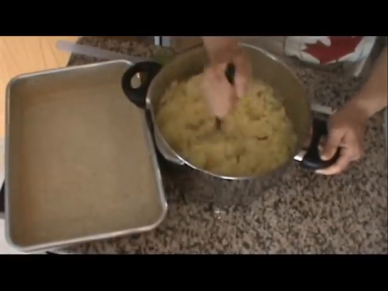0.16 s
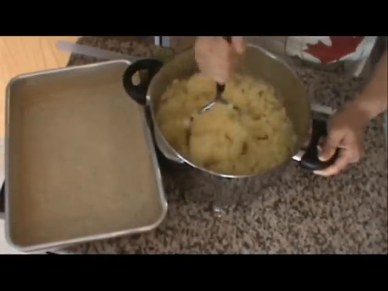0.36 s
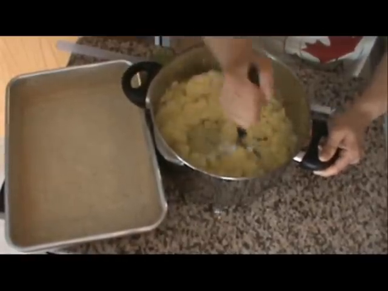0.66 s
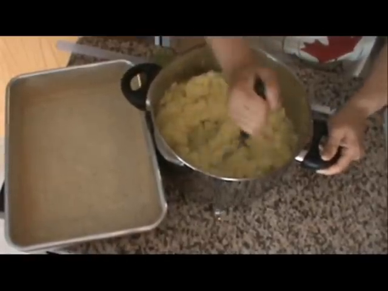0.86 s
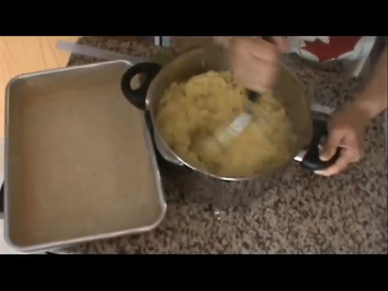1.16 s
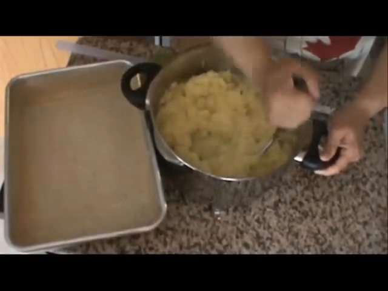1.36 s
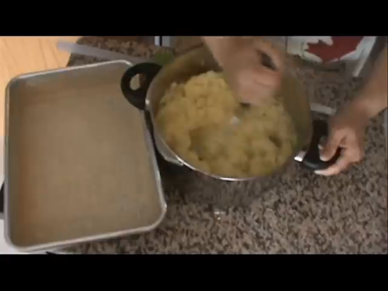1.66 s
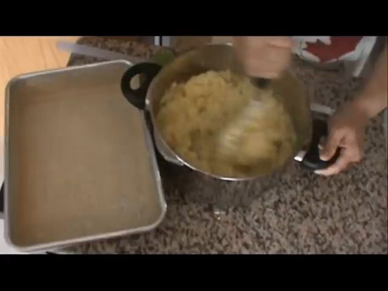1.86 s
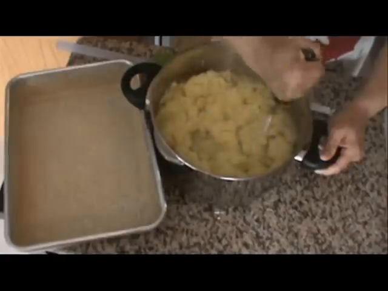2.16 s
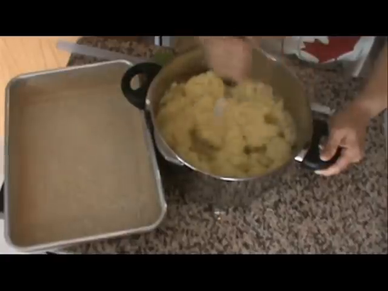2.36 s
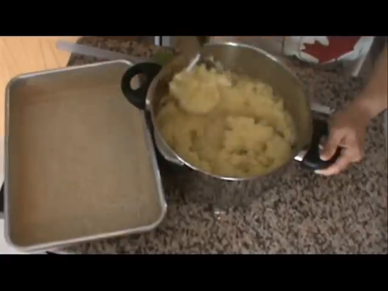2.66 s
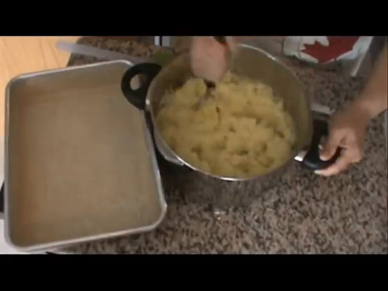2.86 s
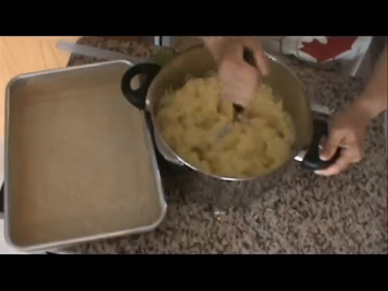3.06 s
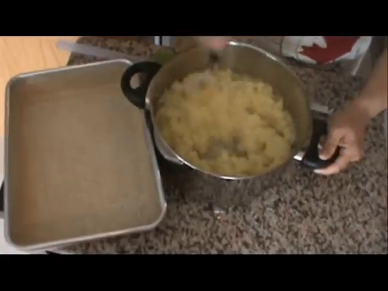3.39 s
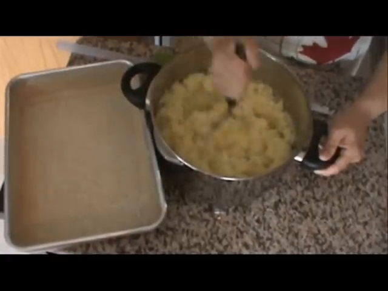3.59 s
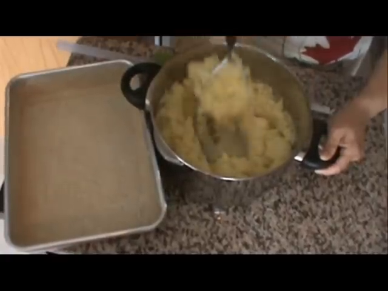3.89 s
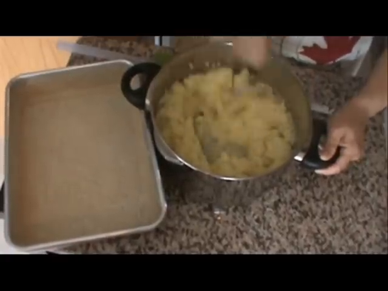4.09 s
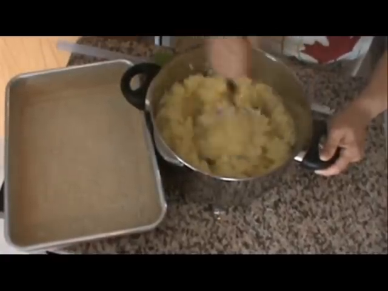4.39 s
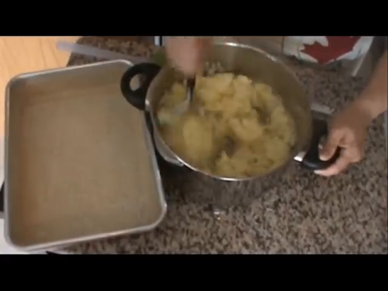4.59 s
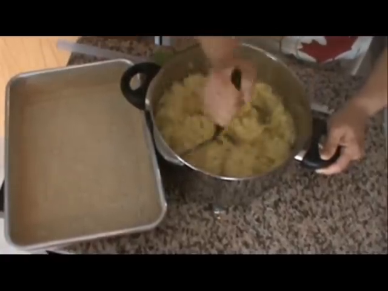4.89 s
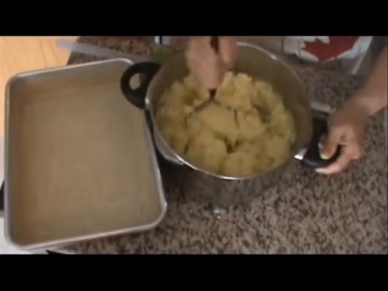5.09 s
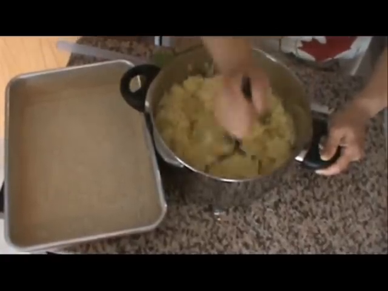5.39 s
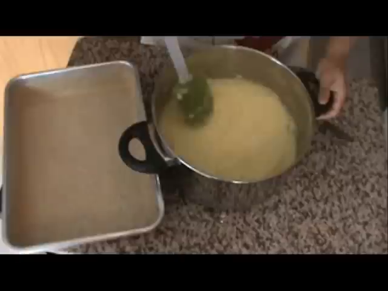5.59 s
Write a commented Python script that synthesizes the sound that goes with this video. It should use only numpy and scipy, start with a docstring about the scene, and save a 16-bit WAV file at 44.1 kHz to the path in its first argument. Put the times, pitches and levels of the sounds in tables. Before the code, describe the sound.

A steel hand masher knocks, scrapes and squelches through hot boiled potatoes in a steel pot, roughly twice every second or so, in a small kitchen.

```python
"""A steel hand masher is driven again and again through boiled potatoes in a steel pot on a stone counter.
Each stroke knocks the wall (noise bursts into wall modes), scrapes down it (dense random clicks) and thuds
on the bottom (low ringing modes). The wet mash squelches (grains in moving cavities), plops and ticks, and
hollow pops come from one side. Under it lie the hum, air and echo of a small kitchen, heard by a close
stereo pair that overloads on the knocks."""
import sys
import numpy as np
from scipy import signal
from scipy.fft import rfft, irfft, next_fast_len
from scipy.io import wavfile
from scipy.ndimage import uniform_filter1d

SR = 44100
rng = np.random.default_rng(int(sys.argv[2]) if len(sys.argv) > 2 else 0)


def log_audio(samples):
    """Write samples as a 16-bit WAV file to the path given in sys.argv[1]."""
    # one column per channel
    frames = np.atleast_2d(samples).T
    # limit to full scale, then quantise
    limited = np.clip(frames, -1, 1)
    pcm = np.round(limited * 32767).astype(np.int16)
    wavfile.write(sys.argv[1], SR, pcm)


def gain_from_db(level_db):
    """Convert decibel levels to linear amplitude factors (20 dB per decade)."""
    decades = np.asarray(level_db, float) / 20
    return 10 ** decades


N = 253303
HZ = np.maximum(np.arange(N // 2 + 1) * SR / N, 1)
CONTROL_STEP = 32   # samples between points of the slow level curves

# Modes of the pot bottom. Each row: pitch in Hz, relative level in dB, 60 dB decay time in s.
BOTTOM_MODES = [(214, 0.5, 0.17), (239, 0.5, 0.16), (269.6, -6, 0.22)]


def rms_one(x):
    """Scales a signal to unit rms."""
    return x / np.sqrt(np.mean(x ** 2) + 1e-20)


def at_hz(points, hz):
    """Reads a table of (Hz, value) on a log-frequency axis."""
    p = np.array(points, float)
    return np.interp(np.log(hz), np.log(np.maximum(p[:, 0], 1)), p[:, 1])


def coloured(x, spectrum):
    """Filters a steady signal by a spectrum in dB and scales it to unit rms."""
    return rms_one(irfft(rfft(x) * gain_from_db(at_hz(spectrum, HZ)), N))


def drift(rate):
    """Slow random wandering of unit rms: noise through two equal lowpass poles at rate Hz."""
    r = np.exp(-2 * np.pi * rate / SR)
    wander = signal.lfilter([1], [1, -2 * r, r * r], rng.standard_normal(N + SR))
    return rms_one(wander[SR:])   # the first second lets the filter settle


def grains(per_s, spread_db):
    """Random clicks of either sign with a long tail of large ones."""
    sizes = gain_from_db(spread_db * np.minimum(rng.exponential(1, N), 4)) * rng.choice([-1, 1], N)
    return sizes * (rng.random(N) < per_s / SR)


def resonance(x, hz, width):
    """Two-pole band of the given width in Hz, gain 1 at its centre."""
    r = np.exp(-np.pi * width / SR)
    poles = [1, -2 * r * np.cos(2 * np.pi * hz / SR), r * r]
    return signal.lfilter([(1 - r * r) / 2, 0, (r * r - 1) / 2], poles, x)


def ring(x, modes):
    """Decaying modes in parallel; a unit click sets each one ringing at its own level."""
    out = 0
    for hz, level_db, t60 in modes:
        r, w = gain_from_db(-60 / (t60 * SR)), 2 * np.pi * hz / SR
        poles = [1, -2 * r * np.cos(w), r * r]
        out = out + signal.lfilter([0, gain_from_db(level_db) * np.sin(w)], poles, x + 1e-18)
    return out


def add(out, s, piece):
    """Lays a piece in at time s."""
    i = round(s * SR)
    out[i:i + len(piece)] += piece[:N - i]


def nearby(x, modes, centre_hz, octaves):
    """Drives the modes (Hz, width Hz, dB) around a moving centre hardest, with alternating signs."""
    out = 0
    for k, (hz, width, db) in enumerate(modes):
        share = np.exp(-.5 * (np.log2(hz / centre_hz) / octaves) ** 2)
        out = out + gain_from_db(db) * resonance(x * share, hz, max(width, 10)) * (-1) ** k
    return out


def pot_wall(x, centre_hz, ring_db):
    """The direct sound plus the resonances of the mash-damped wall near the contact."""
    # Each row: mode pitch in Hz, width in Hz, relative level in dB.
    wall_modes = [(614, 43, 10.5), (860, 15, 5), (1080, 30, 5), (1795, 34, 5.5), (1870, 290, -8.5),
                  (2260, 14, 5.5), (3020, 35, -13), (3163, 31, 3), (3600, 97, -8), (4700, 71, -12),
                  (5930, 110, -9.5), (6260, 110, -18.5)]
    return x + gain_from_db(ring_db) * nearby(x, wall_modes, centre_hz, octaves=0.26)


def press(rows, tail_db, sag_db, lift_db, fade_db):
    """Sudden start, sagging hold, quick lift, slow tail (rates in dB per s): gains and time since the lift."""
    s, level_db, held = rows[:, :3].T[:, :, None]
    t = np.arange(0, N, CONTROL_STEP) / SR - s
    since = np.maximum(t - held, 0)
    stroke = gain_from_db(level_db - sag_db * np.clip(t, 0, held) - lift_db * since)
    tail = gain_from_db(tail_db[:, None] - fade_db * since)
    return (stroke + tail) * (t >= 0), since


def swell(rows):
    """A bell-shaped rise and fall round each crest, one row of gains per event."""
    s, level_db, width = rows[:, :3].T[:, :, None]
    t = np.arange(0, N, CONTROL_STEP) / SR - s
    return gain_from_db(level_db) * np.exp(-.5 * (t / width) ** 2)


def blend(gains, values):
    """Level of all events together in dB, and a value weighted by each event's power."""
    power = np.sum(gains ** 2, axis=0) + 1e-14
    mean = np.sum(gains ** 2 * values, axis=0) / power
    at = np.arange(N) / CONTROL_STEP
    return [np.interp(at, np.arange(len(c)), c) for c in (10 * np.log10(power), mean)]


def patchy(x, patch_db):
    """Half-octave bands swell and sink on their own as the contact wanders."""
    change = 0
    for hz in 1000 * 2. ** np.arange(0, 4, .5):
        band = signal.sosfilt(signal.butter(2, [hz, 1.4 * hz], "band", fs=SR, output="sos"), x)
        change = change + (gain_from_db(patch_db * drift(23.0)) - 1) * band
    return x + change


def rubbing():
    """Steel slips on steel in dense, clumped clicks; the harder the contact, the more the wall rings."""
    # Steel driven down the wall. Each row: start in seconds, scrape level in dB before the body's lift,
    # hold in seconds, sheen in dB relative to that level, pitch in Hz of the wall modes nearest the contact.
    stroke_rows = [(0, -19, 0.15, -9.5, 3330), (0.136, -20, 0.006, -1, 2350),
                   (0.748, -14.5, 0.034, -0.5, 3540), (1.366, -11.5, 0.068, -7.5, 3730),
                   (2.037, -12, 0.09, -3, 4390), (2.695, -11.5, 0.0037, -11, 3690),
                   (2.902, -37, 0.25, -5, 2190), (3.3765, -6, 0.041, -11.5, 3140),
                   (4.146, -25.5, 0.025, 0.5, 4950), (4.731, -19, 0.18, -8.5, 3720),
                   (4.966, -26.5, 0.027, -11, 1990), (5.397, -18, 0.15, -5.5, 3300),
                   (5.57, -17.5, 0.11, -11, 2620)]
    # Steel brushing the wall, swelling and sinking. Each row: crest in seconds, scrape level in dB before
    # the body's lift, half width in seconds, sheen in dB relative to that level, contact pitch in Hz.
    brush_rows = [(0.109, -37.5, 0.018, 23.5, 2500), (0.275, -44.5, 0.011, 17, 3200),
                  (1.05, -38, 0.13, -2, 2630), (1.499, -19.5, 0.03, 8, 6200),
                  (1.73, -40.5, 0.08, 5.5, 4600), (2.125, -17, 0.0077, 3, 6100),
                  (2.645, -36.5, 0.017, -4, 4460), (2.773, -21.5, 0.058, -3.5, 3600),
                  (3.0, -27, 0.018, -21, 2200), (3.55, -26, 0.082, -7, 2700),
                  (4.12, -33.5, 0.041, -2, 3500), (4.39, -28.5, 0.083, -9, 3000),
                  (4.665, -28, 0.021, -30, 4300), (4.874, -21, 0.022, 3, 4700),
                  (5.058, -22, 0.03, -9.5, 2000), (5.143, -13.5, 0.011, -13, 4700),
                  (5.498, -25, 0.013, 9, 6030), (5.54, -23.5, 0.07, -18.5, 4500)]
    # Colour of the slips. Each row: frequency in Hz, relative density in dB per Hz.
    scrape_colour = [(1000, -13), (2000, -4), (3600, 0.5), (5800, 1), (13500, -3), (15500, -25.5)]
    strokes, brushes = np.array(stroke_rows), np.array(brush_rows)
    # the mash sliding back leaves a tail that follows part of the stroke's level
    slide_db = -22 + 0.47 * strokes[:, 1]
    driven, _ = press(strokes, slide_db, sag_db=82.5, lift_db=271, fade_db=39)
    brushed = swell(brushes)
    contacts = np.vstack([strokes[:, 4:], brushes[:, 4:]])
    scrape_db, contact_hz = blend(np.vstack([driven, brushed]), contacts)
    shining = np.vstack([driven * gain_from_db(strokes[:, 3:4]), brushed * gain_from_db(brushes[:, 3:4])])
    sheen_db, _ = blend(shining, 0)

    clumping = gain_from_db(0.82 * drift(32) + 2.13 * drift(300))
    slips = coloured(grains(per_s=13000, spread_db=3.0) * clumping, scrape_colour)
    slips = patchy(slips, patch_db=2.5)
    low, high = (signal.butter(2, 6000, kind, fs=SR, output="sos") for kind in ("low", "high"))
    grit = signal.sosfilt(np.tile(low, (2, 1)), slips)   # each filter runs twice
    sheen = signal.sosfilt(np.tile(high, (2, 1)), slips)
    wall_ring_db = np.minimum(26.0 + 0.71 * scrape_db, 9.0)
    body = pot_wall(gain_from_db(scrape_db) * grit, contact_hz, wall_ring_db)
    return gain_from_db(3.5) * body + gain_from_db(sheen_db) * rms_one(sheen)


def squelch():
    """Wet grains ring cavities of the size the mash has at that moment."""
    # Mash squeezed through the grid. Each row: start in seconds, squelch level in dB, hold in seconds,
    # settling level in dB, cavity pitch in Hz.
    push_rows = [(0, -19, 0.12, -51, 1190), (0.139, -12, 0.053, -26.5, 1780),
                 (0.746, -12.5, 0.0023, -41, 850), (1.37, -18.5, 0.0026, -18, 1310),
                 (1.514, -15.5, 0.0025, -18.5, 910), (2.039, -15, 0.037, -17.5, 774),
                 (2.694, -14, 0.0045, -22, 1270), (2.9, -22.5, 0.008, -20.5, 1390),
                 (3.378, -10.5, 0.047, -18.5, 1060), (3.607, -19, 0.0032, -19.5, 1340),
                 (4.148, -39.5, 0.085, -22.5, 1010), (4.734, -22.5, 0.0064, -24, 1080),
                 (4.97, -19.5, 0.0056, -17, 1270), (5.396, -8, 0.002, -28.5, 1157),
                 (5.569, -15.5, 0.063, -24.5, 1384)]
    # Mash folding over, swelling and sinking. Each row: crest in seconds, squelch level in dB,
    # half width in seconds, cavity pitch in Hz.
    fold_rows = [(0.28, -27, 0.082, 1510), (0.836, -14.5, 0.038, 900), (1.009, -24.5, 0.052, 1390),
                 (1.47, -20, 0.049, 895), (2.29, -30.5, 0.097, 716), (2.63, -24.5, 0.011, 1276),
                 (3.001, -17, 0.015, 1120), (3.052, -19, 0.022, 1450), (4.36, -19.5, 0.057, 1400),
                 (4.92, -22.5, 0.048, 985), (5.09, -24.5, 0.058, 860), (5.54, -24, 0.067, 950)]
    # Colour of the wet grains. Each row: frequency in Hz, relative density in dB per Hz.
    wet_colour = [(250, -13.5), (500, -2), (1000, 2.5), (2000, -1), (4000, -19.5)]
    settled_hz, closing_s = 600, 0.67   # the cavities sink to this pitch as the mash settles
    pushes, folds = np.array(push_rows), np.array(fold_rows)
    pushed, since = press(pushes, pushes[:, 3], sag_db=56, lift_db=368, fade_db=70)
    folded = swell(folds)
    sinking_hz = settled_hz + (pushes[:, 4:] - settled_hz) * np.exp(-since / closing_s)
    folding_hz = folds[:, 3:] + 0 * folded
    squelch_db, cavity_hz = blend(np.vstack([pushed, folded]), np.vstack([sinking_hz, folding_hz]))

    wet = coloured(grains(per_s=3000, spread_db=2.5) * gain_from_db(2.35 * drift(28)), wet_colour)
    cavities = [(hz, 0.18 * hz, 0) for hz in np.geomspace(500, 2200, 12)]
    mash = rms_one(wet + gain_from_db(-3.0) * nearby(wet, cavities, cavity_hz, octaves=0.16))
    # long hard pushes rumble in the bottom and shake the wall
    rumble = gain_from_db(1.62 * uniform_filter1d(squelch_db, size=1800)) * rng.standard_normal(N)
    bottom = ring(rumble, BOTTOM_MODES)
    wall = pot_wall(gain_from_db(squelch_db) * mash, cavity_hz * 0.71, ring_db=9.5 + 0.67 * squelch_db)
    return wall + gain_from_db(-30.5) * bottom


def room_air():
    """Stereo air noise of gently drifting level, with a hum that wavers in level and phase."""
    # Colour of the air. Each row: frequency in Hz, relative density in dB per Hz.
    air_colour = [(12, -39.5), (20, -11.5), (59, 1), (87, -11.5), (122, -5.5), (213, -9.5), (289, -6.5),
                  (614, -13), (725, -14.5), (2090, -26), (15500, -36)]
    # Left-right likeness of the air. Each row: frequency in Hz, likeness from 0 to 1.
    likeness = [(60, 1), (380, 0.93), (1000, 0.44), (2400, .05), (8000, 0.82)]
    # Hum tones. Each row: mean pitch in Hz, middle level in dB.
    hum_tones = [(118.4, -43), (242.2, -39)]
    air_db = -31.5
    mid, side = rfft(rng.standard_normal((2, N)))
    alike = np.clip(at_hz(likeness, HZ), 0, 1)
    pair = np.sqrt(1 + alike) * mid + np.sqrt(1 - alike) * side * [[1], [-1]]
    noise = rms_one(irfft(pair * gain_from_db(at_hz(air_colour, HZ)), N))
    air = gain_from_db(air_db + 1.0 * drift(1)) * noise
    t = np.arange(N) / SR
    hum = 0
    for hz, db in hum_tones:
        hum = hum + gain_from_db(db + 2.2 * drift(37)) * np.sin(2 * np.pi * hz * t + 3.1 * drift(1.5))
    return air + hum


def kitchen(x):
    """Room echo from eight feedback delays a side, each pass duller and weaker."""
    t60_s, wall_cut_hz = 0.61, 7500
    size = next_fast_len(N + SR)
    w = 2 * np.pi * np.arange(size // 2 + 1) / size
    dull = 1 / (1 + 1j * w * SR / (2 * np.pi * wall_cut_hz))
    out = np.zeros((2, len(w)), complex)
    for k, lag in enumerate(rng.uniform(.008, .035, 16) * SR):
        loop = gain_from_db(-60 * lag / SR / t60_s) * dull * np.exp(-1j * w * int(lag))
        out[k % 2] += loop / (1 - loop) * (-1) ** (k // 2)
    return irfft(out * rfft(x, size), size)[:, :N]


def ticks():
    """Sticky mash tears off the steel in short bright snaps of filtered noise, with faint ones at random."""
    # Each row: start in seconds, peak level in dB, pitch in Hz.
    tears = [(0.1056, -17, 7850), (1.055, -13.5, 7830), (1.725, -9.5, 5060), (1.827, -15, 11400),
             (2.517, -14.5, 10200), (3.7577, -12, 4200)]
    out, t = np.zeros(N), np.arange(800) / SR
    for s, peak_db, hz in tears:
        noise = rng.standard_normal(len(t))
        snap = resonance(noise * np.exp(-t / 0.003), hz, 0.45 * hz)
        add(out, s, gain_from_db(peak_db) * snap / np.max(np.abs(snap)))
    envelope = signal.lfilter([1], [1, -.985], np.abs(grains(per_s=45, spread_db=3.0)))
    faint = envelope * rng.standard_normal(N)
    return out + gain_from_db(-33) * resonance(faint, 9500, 6000)


def knocks():
    """A crack of chattering contact into the wall, a rumbling push on the bottom, a slower one on the counter."""
    # Masher on pot. Each row: start in seconds, crack peak in dB, bottom thud in dB before its lift,
    # pitch of the clank in Hz.
    hits = [(0.14, 6, -16.5, 2000), (0.166, 6, -17.5, 1290), (0.747, -2.5, -23, 1250),
            (0.836, 9.5, -15, 1770), (1.368, 6.5, -44, 1270), (1.375, 3, -37, 1290),
            (1.52, 4.5, -6.5, 1080), (1.527, -3, -22.5, 930), (2.036, 6, -17.5, 2480),
            (2.63, -12, -35.5, 1360), (2.646, -10.5, -39.5, 3800), (2.696, 7, -17.5, 3220),
            (2.902, 2.5, -14.5, 1756), (2.908, 3, -19.5, 1500), (3.377, 4.5, -17, 3100),
            (3.61, 10, -15.5, 1300), (4.218, -6, -38, 5030), (4.222, 4, -19.5, 1200),
            (4.737, -16, -19, 1030), (4.968, 12.5, -9.5, 1310), (5.396, 9.5, -22.5, 3600),
            (5.549, -1.5, -20.5, 1190), (5.571, 4.5, -10.5, 2340), (5.575, 1, -25.5, 2810),
            (5.59, 2.5, -16, 1885)]
    # The pot pressed on the counter. Each row: start in seconds, push in dB.
    counter_pushes = [(0.171, -30.5), (0.855, -26), (1.541, -23.5), (2.279, -26), (2.92, -29), (3.631, -29),
                      (4.241, -29.5)]
    # Modes of the counter top. Each row: pitch in Hz, relative level in dB, 60 dB decay time in s.
    counter_modes = [(30.8, 2, 0.48), (56.4, 7.5, 0.45)]
    thud_lift_db = 7.5
    out, shake = np.zeros((2, N))
    t = np.arange(9000) / SR
    for s, peak_db, thud_db, clank_hz in hits:
        noise, grind = rng.standard_normal((2, len(t)))
        burst = noise * (np.exp(-t / 0.0016) + 0.14 * np.exp(-t / .007))   # first touch, then chatter
        burst[0] = 3   # the contact opens hard
        clank = resonance(resonance(burst, clank_hz, 1.3 * clank_hz), clank_hz, 1.3 * clank_hz)
        crack = clank + gain_from_db(-14.0) * resonance(burst, 2 * clank_hz, 4000)
        crack = pot_wall(crack, clank_hz, ring_db=12)
        # the grid grinds down, so every thud stirs the modes anew
        thud = ring(np.diff(grind * np.exp(-t / 0.018), prepend=0), BOTTOM_MODES)
        thud *= np.cos(.5 * np.pi * t / t[-1]) / np.max(np.abs(thud))
        add(out, s, gain_from_db(peak_db) * crack / np.max(np.abs(crack)) + gain_from_db(thud_db + thud_lift_db) * thud)
    for s, db in counter_pushes:
        add(shake, s, gain_from_db(db) * np.hanning(500) / 250)
    return out + ring(shake, counter_modes)


def plops(rows):
    """Each air pocket bursts as a rough puff of noise ringing a wide cavity and a fainter one above it."""
    out, t = np.zeros(N), np.arange(3000) / SR
    for s, peak_db, hz, length in rows:
        air = rng.standard_normal(len(t))
        air[:20] = .006 / length   # small pockets give way in one push
        puff = air * (1 - np.exp(-t / 0.00026)) * np.exp(-t / max(length, .001))
        cavity = resonance(resonance(puff, hz, 0.35 * hz), hz, 0.35 * hz)
        upper = resonance(resonance(puff, 2.35 * hz, 1.8 * hz), 2.35 * hz, 1.8 * hz)
        burst = cavity + gain_from_db(-13) * upper
        add(out, s, gain_from_db(peak_db) * burst / np.max(np.abs(burst)))
    return out


def biting():
    """The grid sings as it bites into the wall: chatter of the contact rings its own modes in clear bands."""
    # Each row: start in seconds, level in dB before the lift at the end, hold in seconds,
    # pitch in Hz of the modes driven hardest.
    bite_rows = [(1.42, -23.5, 0.032, 5700), (2.038, -10.5, 0.052, 2600), (5.394, -31, 0.085, 3710)]
    # Modes of the masher grid. Each row: pitch in Hz, width in Hz, relative level in dB.
    grid_modes = [(2230, 120, -1.5), (3520, 200, -3), (4750, 350, -7), (5800, 110, -3), (6130, 150, -5)]
    bites = np.array(bite_rows)
    gains, _ = press(bites, -11 + bites[:, 1], sag_db=60, lift_db=302, fade_db=90)
    bite_db, driven_hz = blend(gains, bites[:, 3:])
    chatter = rms_one(grains(per_s=4000, spread_db=4.5))
    return gain_from_db(22.5) * nearby(gain_from_db(bite_db) * chatter, grid_modes, driven_hz, octaves=0.72)


def scene():
    """The pot reaches the two capsules with a small lean and lead; walls close by echo from the sides."""
    # Air pockets bursting in the mash. Each row: start in seconds, peak in dB, pitch in Hz, length in seconds.
    pockets = [(0.259, -6.5, 1640, 0.039), (0.793, -6.5, 860, 0.0028), (0.853, -5, 1570, 0.0083),
               (0.981, -8.5, 1670, 0.025), (2.248, -7.5, 660, 0.0046), (2.847, -13.5, 880, 0.029),
               (2.999, -9, 1630, 0.0062), (4.195, -4.5, 1080, 0.0028), (4.275, -16, 990, 0.0047),
               (4.308, -16, 1030, .008)]
    # Hollow pops from off to one side. Each row: start in seconds, peak in dB, pitch in Hz, length in seconds.
    side_pockets = [(2.391, -16, 1000, 0.018), (3.157, -15.5, 780, 0.0051), (4.489, -1.5, 850, 0.0034),
                    (4.547, -4.5, 1040, 0.0076), (4.555, -7.5, 760, 0.0049), (5.128, 4.5, 768, 0.02),
                    (5.142, 2.5, 1100, 0.012), (5.154, 3, 920, 0.0021), (5.164, -7, 870, 0.011),
                    (5.22, -12, 826, 0.0041), (5.264, -11.5, 760, 0.015), (5.351, -1.5, 893, 0.015)]
    # Stereo lead of the pot. Each row: frequency in Hz, phase in radians by which left leads.
    lead = [(100, .45), (160, .75), (300, .75), (500, .2), (900, .8), (1300, 0)]
    # Stereo lean of the pot. Each row: frequency in Hz, left minus right in dB.
    lean = [(110, 1), (250, 3), (600, 0)]
    side_lag_s, side_lean_db, side_echo_db = 0.00016, -2, 9   # left leads, right is louder
    kitchen_db = -24
    pot = rubbing() + biting() + squelch() + knocks() + plops(pockets) + ticks()
    pops = plops(side_pockets)

    # each filter serves the left, its inverse the right
    aside = gain_from_db(side_lean_db / 2) * np.exp(1j * np.pi * HZ * side_lag_s)
    half = gain_from_db(at_hz(lean, HZ) / 2) * np.exp(.5j * at_hz(lead, HZ))
    pot_pair = rfft(pot) * np.array([half, 1 / half])
    pops_pair = rfft(pops) * np.array([aside, 1 / aside])
    near = irfft(pot_pair + pops_pair, N)

    echoes = np.zeros(400)
    echoes[rng.integers(40, 400, 8)] = rng.choice([-1, 1], 8)
    echoed = signal.fftconvolve(pot + gain_from_db(side_echo_db) * pops, echoes)[:N]
    sides = gain_from_db(-26.0) * resonance(echoed, 1200, 2500) + gain_from_db(-32.5) * resonance(echoed, 9000, 9000)
    wide = sides * [[1], [-1]]   # opposite sign left and right
    return near + wide + gain_from_db(kitchen_db) * kitchen(pot + pops) + room_air()


def band_limit(x):
    """A steep low-pass at the top of the band."""
    return signal.sosfilt(signal.butter(12, 15650, fs=SR, output="sos"), x)


def record(dry):
    """Peaks overload softly, the top is cut; at the end the sound dips 15 dB, fades and stops."""
    end_s, fade_s = 5.613, .021
    t = np.arange(N) / SR
    fade = np.where(t < end_s, 1, gain_from_db(-15) * np.clip(1 - (t - end_s) / fade_s, 0, 1))
    overloaded = 1.162 * np.tanh(dry / 1.81)
    loud = signal.sosfilt(signal.cheby2(10, 50, 15600, fs=SR, output="sos"), overloaded)
    return band_limit(np.clip(loud, -1, 1) * fade)


dry = scene()
out = record(dry)
log_audio(out)
```